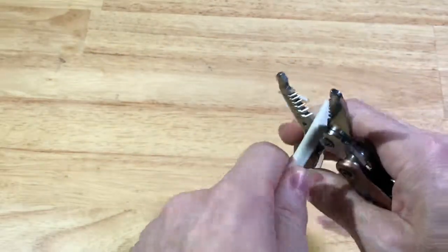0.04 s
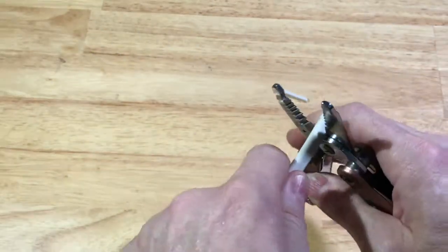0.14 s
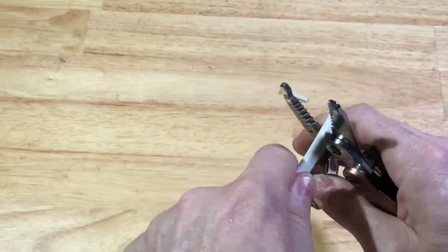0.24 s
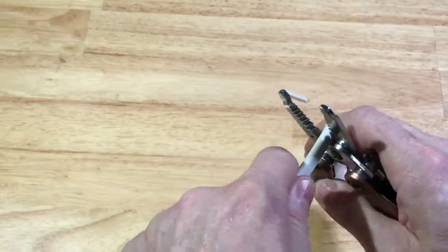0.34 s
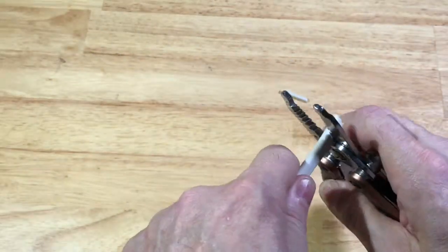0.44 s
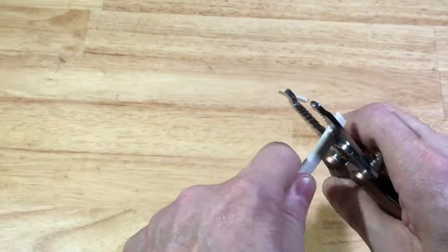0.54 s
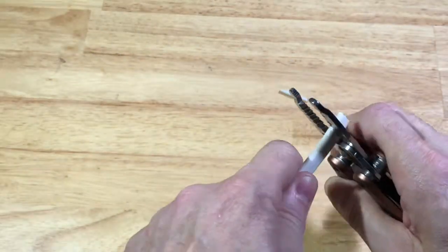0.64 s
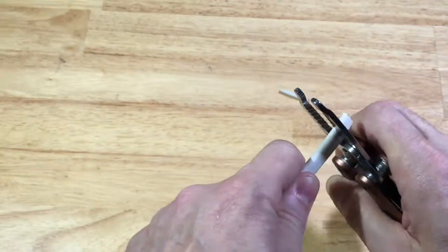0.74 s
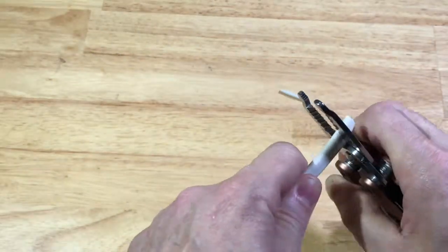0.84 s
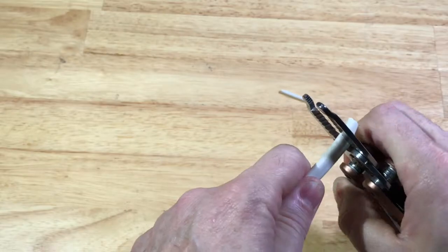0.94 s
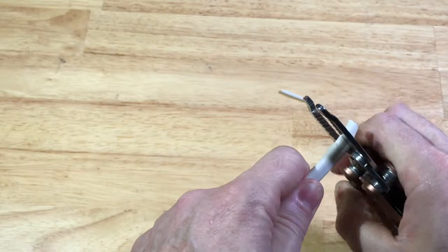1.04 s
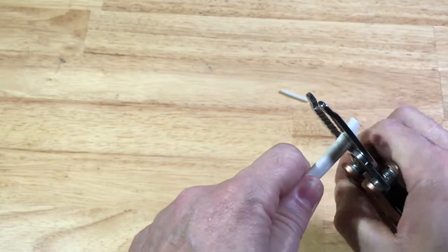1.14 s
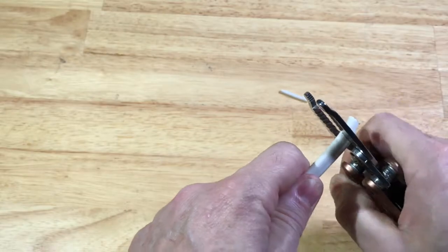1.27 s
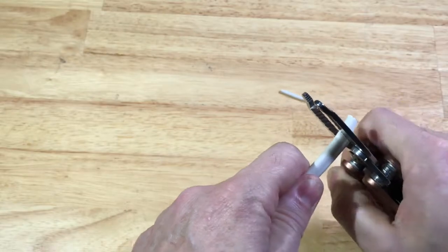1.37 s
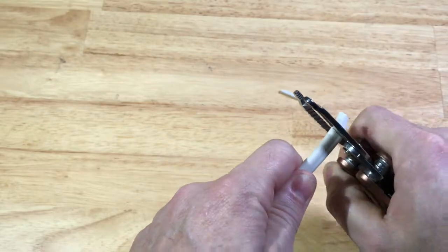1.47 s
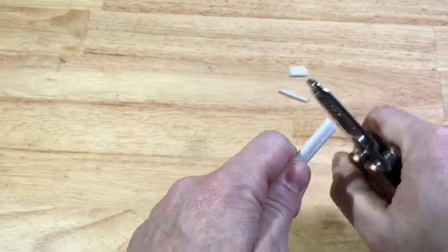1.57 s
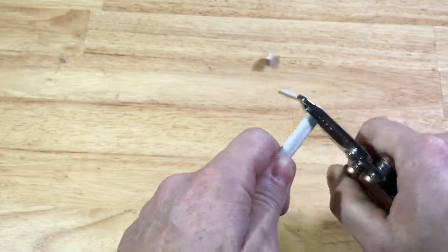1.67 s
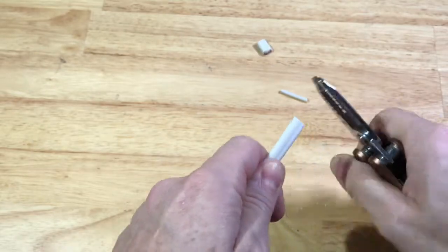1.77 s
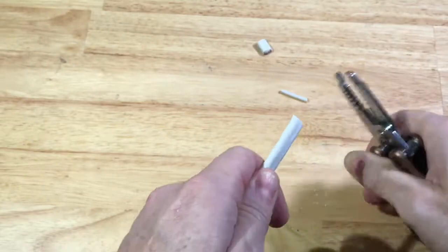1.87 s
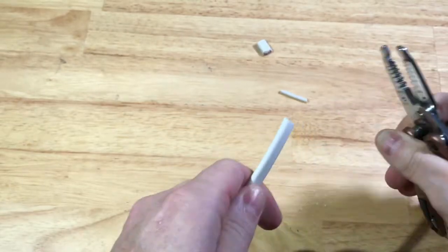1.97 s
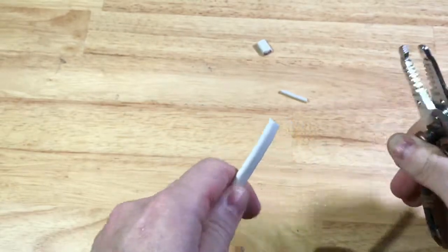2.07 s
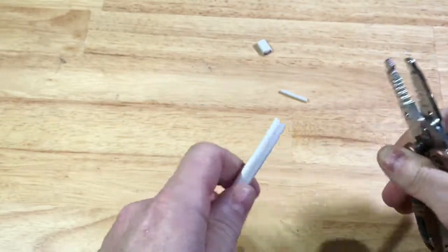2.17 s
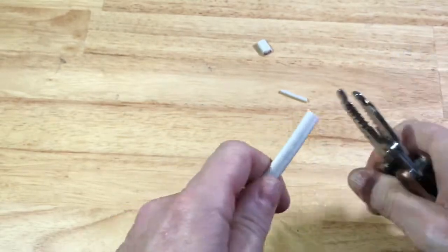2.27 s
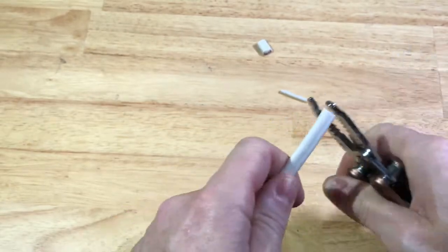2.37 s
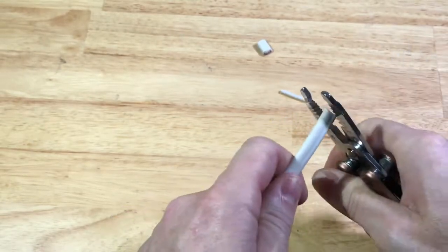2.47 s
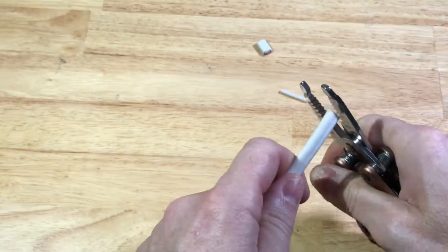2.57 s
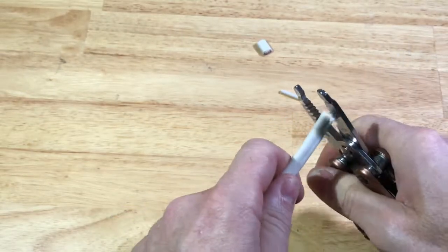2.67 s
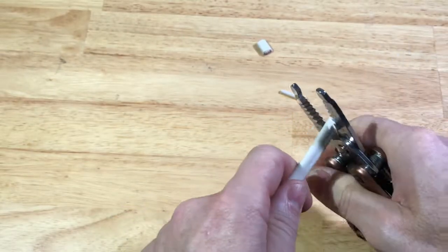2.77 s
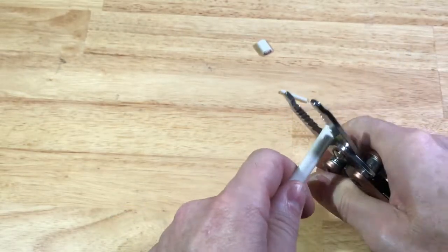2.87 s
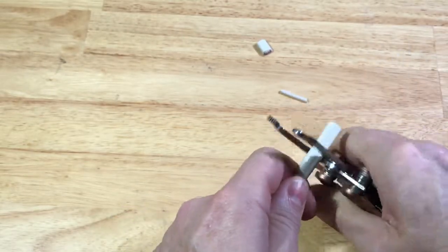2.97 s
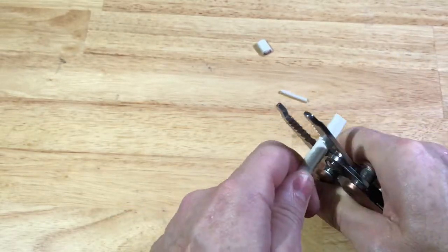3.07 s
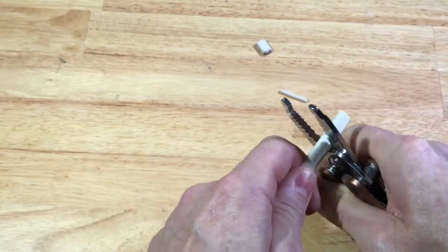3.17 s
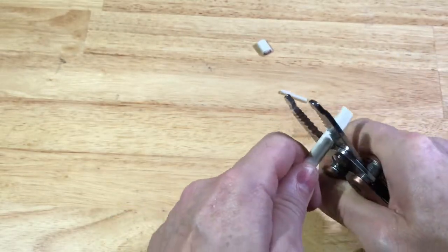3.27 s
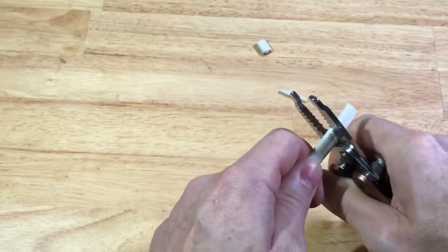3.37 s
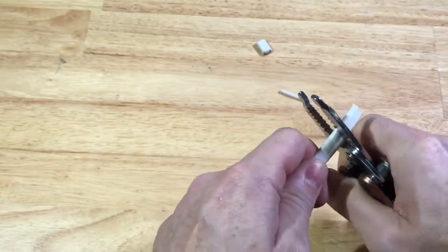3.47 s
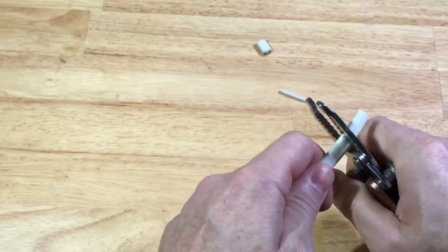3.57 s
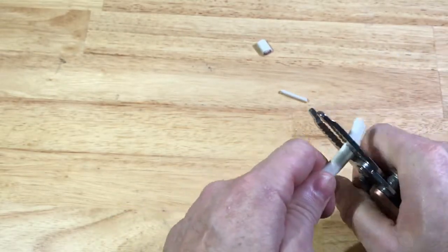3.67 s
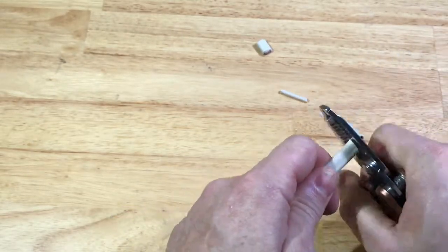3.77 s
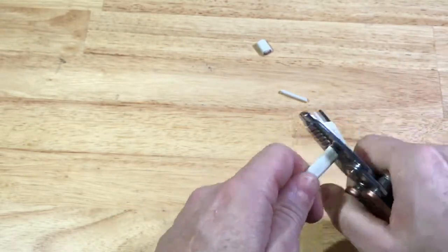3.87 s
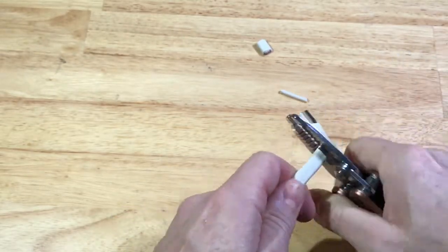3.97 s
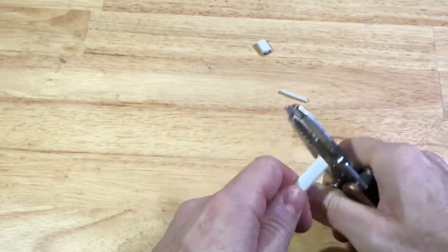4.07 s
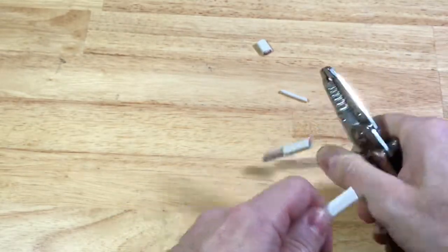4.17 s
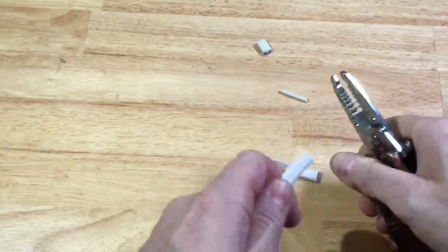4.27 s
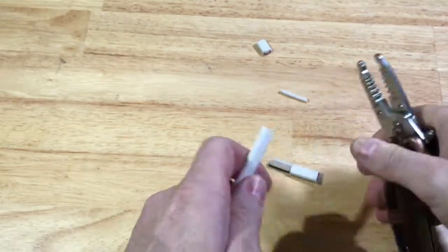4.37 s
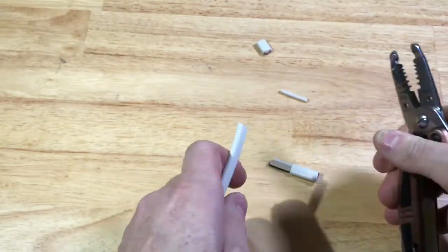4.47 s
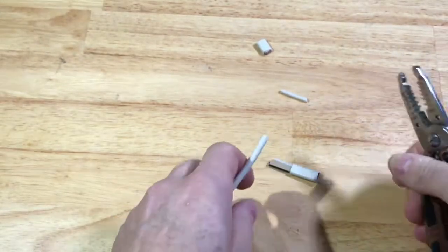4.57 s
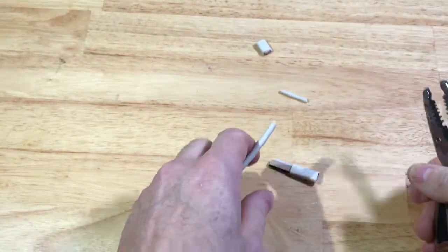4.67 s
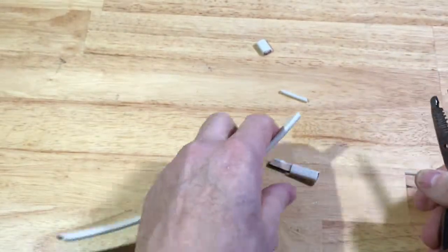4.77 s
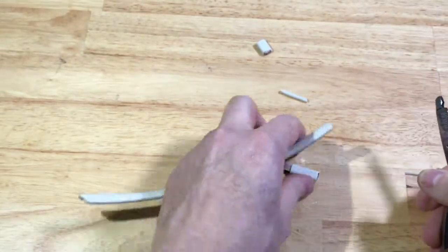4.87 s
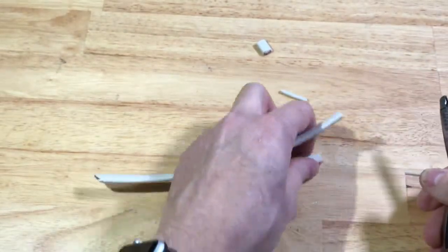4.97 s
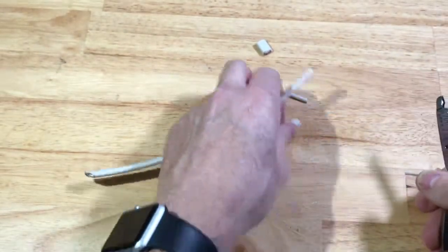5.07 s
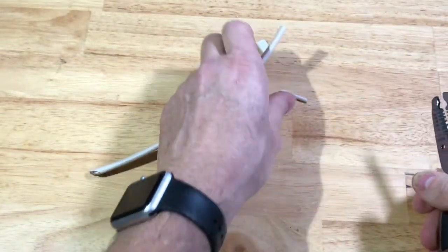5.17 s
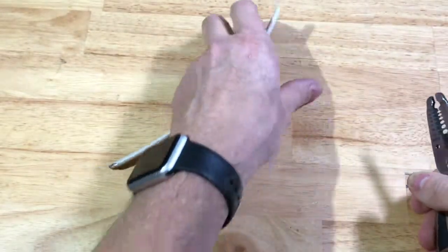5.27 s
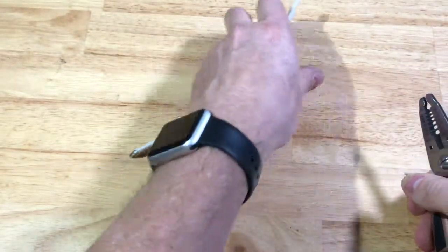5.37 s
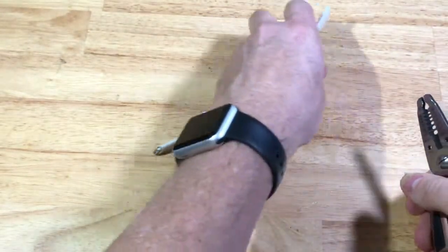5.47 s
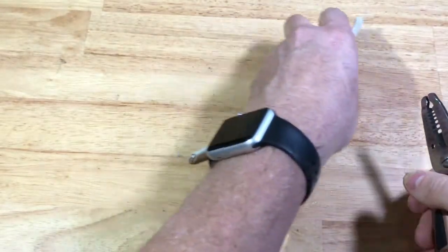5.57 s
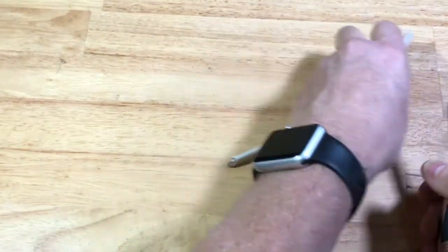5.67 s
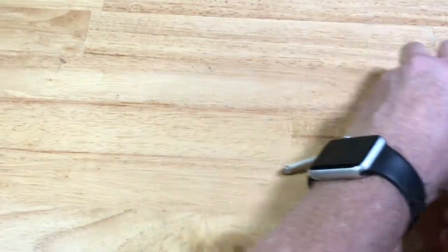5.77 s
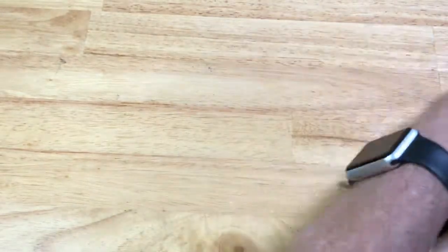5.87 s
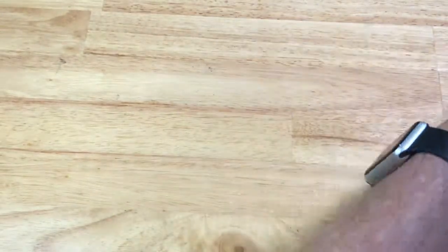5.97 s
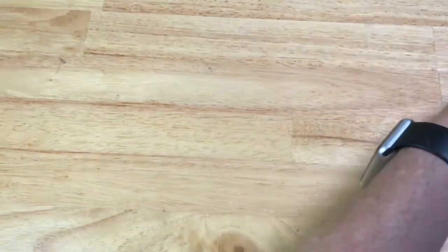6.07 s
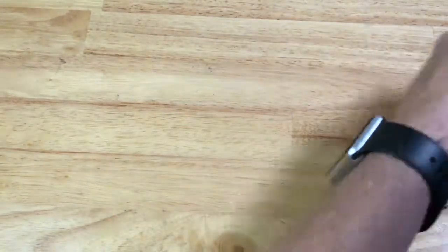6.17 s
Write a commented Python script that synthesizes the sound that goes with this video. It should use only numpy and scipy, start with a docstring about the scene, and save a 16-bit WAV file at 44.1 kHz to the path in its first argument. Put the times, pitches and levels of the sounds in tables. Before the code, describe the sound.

Steel wire strippers creak and tick on a plastic-sheathed cable, crunch and slam shut twice, offcuts knock on a wooden bench, then a hand sweeps.

```python
"""Over room air and a low hum, steel wire strippers creak and tick on a sheathed cable, crunch through it and slam shut.
Offcuts and the tool knock on the wooden bench, plastic scrapes, loose parts click, and a second cut follows.
Last, a hand sweeps the scraps away. Blows are short noise bursts plus decaying modes of steel or wood;
creaks, scrapes and the sweep are flickering friction noise. A small room answers all but the air and hum."""
import sys
import numpy as np
from scipy import signal
from scipy.fft import rfft, irfft
from scipy.io import wavfile
from scipy.ndimage import uniform_filter1d

SR = 44100
rng = np.random.default_rng(int(sys.argv[2]) if len(sys.argv) > 2 else 0)


def bounce(signal):
    """Save signal as a 16-bit WAV file at the path given by the first command-line argument."""
    frames = np.transpose(np.atleast_2d(signal))
    limited = np.clip(frames, -1, 1)
    pcm = np.round(limited * 32767).astype(np.int16)
    wavfile.write(sys.argv[1], SR, pcm)


N = 274743
T = np.arange(N) / SR
HIT = T[:2 ** 15]  # time since a blow [s]
TOP_HZ = 16100  # upper edge of the room's echoes and of the finished sound


def undb(db):
    """Turn decibels into gain."""
    return 10 ** (np.asarray(db) / 20)


def unit(x):
    """Scale to an energy of one."""
    return x / np.sqrt(np.sum(x ** 2))


def level(x, db):
    """Scale to an rms level."""
    return x * undb(db) / np.std(x)


def add(out, s, x):
    """Mix a sound in at a time in seconds."""
    i = int(s * SR)
    out[i:i + len(x)] += x[:N - i]


def colour(x, points, size=4096):
    """Filter with a spectrum of (frequency [Hz], level [dB]) points, at minimum phase so nothing sounds early."""
    hz, db = np.transpose(points)
    grid = np.maximum(np.fft.rfftfreq(size, 1 / SR), 1)
    curve_db = np.interp(np.log(grid), np.log(hz), db)
    # folding the cepstrum onto positive time makes the filter causal
    cepstrum = irfft(np.log(undb(curve_db)))
    cepstrum[1:size // 2] *= 2
    cepstrum[size // 2 + 1:] = 0
    response = irfft(np.exp(rfft(cepstrum)))
    return signal.fftconvolve(x, response)[:len(x)]


def band(x, low_hz, top_hz, order=2):
    """Keep what lies between two edges."""
    for hz, kind in ((low_hz, "high"), (top_hz, "low")):
        sos = signal.butter(order, min(hz, SR / 2 - 1000), kind, fs=SR, output="sos")
        x = signal.sosfilt(sos, x + 1e-18)
    return x


def resonate(x, hz, width_hz):
    """Pass one resonance with a gain of one at its centre."""
    return signal.lfilter(*signal.iirpeak(hz, hz / width_hz, fs=SR), x)


def fade(t, t60):
    """Amplitude that falls 60 dB in t60 seconds."""
    return np.exp(-np.log(1000) * t / t60)


def walk(rate):
    """Random drift with a spread of one, heading for a new value about rate times a second."""
    k = max(int(SR / rate), 2)
    steps = np.repeat(rng.standard_normal(N // k + 1), k)
    return level(uniform_filter1d(steps, k)[:N], 0)


def ring(modes, scatter_db):
    """Decaying modes of a struck body; each blow weights them anew."""
    hz, db, t60 = np.transpose(modes)[:, :, None]
    gain = undb(db + scatter_db * rng.standard_normal(hz.shape))
    sign = rng.choice([-1, 1], hz.shape)
    weight = gain * sign / np.sqrt(t60)  # long modes start lower
    return unit(np.sum(weight * fade(HIT, t60) * np.sin(2 * np.pi * hz * HIT), axis=0))


def burst(envelope, spectrum):
    """A crowd of tiny impacts under an envelope, evenly spread over all pitches, heard through a body."""
    x = rng.standard_normal(len(envelope)) * envelope
    for _ in range(3):  # flatten the spectrum, then restore the envelope
        x = irfft(np.exp(1j * np.angle(rfft(x))), len(x))
        loudness = np.sqrt(np.abs(uniform_filter1d(x ** 2, size=64)) + 1e-18)
        x = envelope * x / loudness
    return unit(colour(x, spectrum))


def blow(x, db, low_hz, top_hz):
    """The contact narrows the band; the level is that of the energy packed into 10 ms."""
    return unit(band(x, low_hz, top_hz)) * undb(db) * np.sqrt(SR / 100)


def friction(spectrum, grain_db, flicker_db, count=10):
    """Dense tiny slips of uneven size, whose pitch regions flicker independently so the colour shifts."""
    size_db = grain_db * np.minimum(rng.exponential(size=N), 6)
    slips = colour(rng.standard_normal(N) * undb(size_db), spectrum)
    pitch = np.log(np.fft.rfftfreq(N, 1 / SR) + 1)
    centres = np.log(np.geomspace(300, 14000, count))
    spread = rfft(slips)
    shifting = np.zeros(N)
    for own in np.eye(count):
        region = irfft(spread * np.interp(pitch, centres, own), N)
        shifting += region * undb(flicker_db * walk(22))
    return level(shifting, 0)


# tone of the still room air: (frequency [Hz], density [dB per Hz])
AIR_TONE = [(15, -39.5), (25, -6), (66, -2), (89, -7), (108, -21.5), (123, -5.5), (145, 0), (170, -18.5),
            (206, -14.5), (354, -18), (734, -25), (962, -28.5), (2610, -33), (16000, -40.5)]


def background(hum_hz=140, hum_db=-73, air_db=-63, rumble_hz=44):
    """Still room air as coloured noise, and a low hum that wavers in phase and level."""
    hum = np.sin(2 * np.pi * hum_hz * T + 0.52 * walk(2.6)) * undb(2.8 * walk(4.7))
    air = band(colour(rng.standard_normal(N), AIR_TONE), rumble_hz, SR / 2, order=4)
    return level(air, air_db) + level(hum, hum_db)


# how the room answers: (frequency [Hz], t60 [s], echo level [dB])
ROOM_BANDS = [(130, 0.35, -7), (400, 0.29, -9.5), (990, 0.61, -12), (2400, .56, -14), (5500, 0.58, -15),
              (8900, 0.25, -19), (15000, 0.3, -18)]


def room(x, build_s=0.0065, count=27):
    """Diffuse wall echoes: noise in each band swells with the sound's energy and drains at that band's rate."""
    hz, t60, db = np.transpose(ROOM_BANDS)
    edges = np.geomspace(70, TOP_HZ, count)
    out = 0
    for low, top in zip(edges, edges[1:]):
        sos = signal.butter(2, [low, top], "band", fs=SR, output="sos")
        centre = np.log(low * top) / 2
        decay = np.interp(centre, np.log(hz), t60)
        wet_db = np.interp(centre, np.log(hz), db)
        energy = signal.sosfilt(sos, x + 1e-18) ** 2
        for seconds in (build_s, decay / (2 * np.log(1000))):
            keep = np.exp(-1 / (seconds * SR))
            energy = signal.lfilter([1 - keep], [1, -keep], energy)
        echoes = level(signal.sosfilt(sos, rng.standard_normal(N)), wet_db)
        out = out + np.sqrt(energy) * echoes
    return out


# the sweeping hand, before trims and grit: (time [s], rub of the palm [dB], hiss of the skin [dB])
HAND_MOVES = [(4.9, -72, -95), (5.012, -68, -64.5), (5.08, -80, -69.5), (5.126, -63.5, -55),
              (5.264, -59.5, -69), (5.286, -64, -64.5), (5.376, -65.5, -70), (5.532, -66.5, -56),
              (5.564, -53, -52), (5.598, -55, -70), (5.766, -58, -59), (5.932, -57.5, -63),
              (6.024, -56, -57), (6.058, -46, -62), (6.186, -76.5, -83), (6.22, -84, -82)]
# tone of the palm's rub: (frequency [Hz], level [dB])
PALM_TONE = [(100, -3.5), (250, 5), (600, 3), (1500, 0.5), (3000, -3), (6000, -7), (14000, -26.5)]
# tone of the skin's hiss: (frequency [Hz], level [dB])
SKIN_TONE = [(1000, -22), (3000, -8), (5500, -0.5), (9000, 1), (13000, -0.5), (16000, -2)]


def hand(palm_db=0, skin_db=-1, grit_db=1.0, grit_per_s=350):
    """A hand slides over the wood, catching on its grain and pushing the scraps along."""
    s, *columns = np.transpose(HAND_MOVES)
    rub, hiss = (undb(np.interp(T, s, c, left=-120)) for c in columns)
    grit = undb(grit_db * walk(grit_per_s))
    palm = rub * undb(palm_db) * friction(PALM_TONE, grain_db=2.0, flicker_db=4.0)
    skin = hiss * undb(skin_db) * friction(SKIN_TONE, grain_db=1.5, flicker_db=4.5)
    return grit * (palm + skin)


# modes of the bench and what lies on it: (frequency [Hz], level [dB], t60 [s])
WOOD_MODES = [(134.2, 6.5, 0.47), (196, -4, 0.27), (267, -5, .22), (326.9, -14.5, 0.65), (383, 3.5, 0.17),
              (451, -2, 0.46), (521, -12.5, 0.21), (726, -8, 0.083), (860, -4, 0.14), (1016, -0.5, .09),
              (1183.4, -4.5, 0.1), (1507, -25, 2.2), (8005, -33.5, 0.22)]
# dense wood resonances between the modes: (frequency [Hz], density [dB per Hz])
WOOD_TONE = [(80, -5), (150, 0), (500, -5.5), (950, -2), (1400, -7), (2000, -16), (3000, -23), (5000, -30),
             (9000, -30.5), (16000, -23.5)]


def knock(db, top_hz, modes_db=-2.5, board_db=1, board_t60=0.12):
    """A blow spreads through the wooden top, whose modes ring on; a softer one lasts longer and reaches lower."""
    softness = 4000 / top_hz
    contact = 0.0054 * softness ** 0.49  # [s]
    low_hz = 118 / softness ** .18
    push = burst(np.exp(-(HIT / contact) ** 2 / 2), WOOD_TONE)
    board = undb(board_db) * burst(fade(HIT, board_t60), WOOD_TONE)
    modes = undb(modes_db) * ring(WOOD_MODES, scatter_db=.3)
    onset = 1 - np.exp(-10 * HIT / contact)  # a soft contact builds up slowly
    return blow(onset * (push + board + modes), db, low_hz, top_hz)


# knocks on the bench: (time [s], level [dB], top edge [Hz], high for a hard contact)
BENCH_KNOCKS = [(1.743, -35, 8780), (1.814, -52, 2994), (1.9382, -15.5, 4180), (4.085, -54, 5000),
                (4.2985, -34, 6950), (4.353, -44.5, 1500), (4.387, -38, 1300), (4.414, -44.5, 695),
                (4.6394, -22.5, 4850), (5.25, -48.5, 5000), (5.413, -43, 98)]


def bench(bounce_s=.012, bounce_db=-9.5, bounce_top_share=0.54):
    """Things land on the bench and bounce once, weaker and duller."""
    out = np.zeros(N)
    for s, db, top_hz in BENCH_KNOCKS:
        add(out, s, knock(db, top_hz))
        add(out, s + bounce_s, knock(db + bounce_db, bounce_top_share * top_hz))
    return out


# tone of the rubbed plastic sheath, for scrapes and creaks: (frequency [Hz], level [dB])
SHEATH_TONE = [(500, -10.5), (2200, 1.5), (4500, 0), (8000, -4), (11000, -8.5), (16000, -12.5)]
# plastic strokes on the blades or the bench: (middle [s], length [s], level [dB], squeak [Hz])
SCRAPE_STROKES = [(1.081, 0.013, -66, 6840), (1.137, 0.0065, -65.5, 2088), (1.314, 0.014, -68.5, 2060),
                  (1.359, 0.011, -67, 5713), (3.037, 0.042, -61, 4700), (4.056, 0.057, -61.5, 4810),
                  (5.825, .067, -54, 5570), (5.925, 0.065, -53.5, 2280), (5.999, 0.023, -50, 4960)]


def scrapes(squeak_db=-5, squeak_share=0.2):
    """The plastic sheath creeps over steel or wood in short strokes, each with a faint squeak."""
    slips = friction(SHEATH_TONE, grain_db=4, flicker_db=3.0)
    out = np.zeros(N)
    for s, length, db, hz in SCRAPE_STROKES:
        squeak = level(resonate(slips, hz, squeak_share * hz), squeak_db)
        stroke = np.exp(-2 * ((T - s) / length) ** 2)
        out += level(slips + squeak, db) * stroke
    return out


# modes of the tool: (frequency [Hz], level [dB], t60 [s])
STEEL_MODES = [(899.6, -4.5, 0.029), (1844, -2, .03), (2249, -1, 0.025), (2855, 0.5, 0.046),
               (2910, -6, 0.033), (4234, -4, 0.041), (4760, -2.5, .025), (5890, 0, .025),
               (6770, -3.5, .025), (7900, -4, .025), (9000, 1, 0.022), (10260, -7, 0.033)]
# dense steel resonances between the modes: (frequency [Hz], density [dB per Hz])
STEEL_TONE = [(120, -15), (300, -6.5), (600, -14.5), (1300, -8.5), (2000, 0.5), (2800, -2), (3500, -3),
              (5500, 0.5), (9000, 2), (12500, -4), (16000, -4.5)]


def clink(db, chatter, part_hz, low_hz, top_hz, modes_db=-5.5, rattle_db=-5, rattle_t60=0.048,
          part_db=-8, part_t60=0.013):
    """Steel meets steel: a short chatter, the struck part pings, the arms ring, the pivot and spring rattle."""
    crack = burst(np.exp(-(HIT / chatter) ** 2 / 2), STEEL_TONE)
    part = undb(part_db) * unit(fade(HIT, part_t60) * np.sin(2 * np.pi * part_hz * HIT))
    arms = undb(modes_db) * ring(STEEL_MODES, scatter_db=2.0)
    rattle = undb(rattle_db) * burst(fade(HIT, rattle_t60), STEEL_TONE)
    return blow(crack + part + arms + rattle, db, low_hz, top_hz)


def click(db, chatter, part_hz, top_hz, **ping):
    """A light contact moves only one part: the higher its pitch, the thinner the sound."""
    return clink(db, chatter, part_hz, 0.29 * part_hz, top_hz, **ping)


# the jaws bear down on the sheath: (start [s], end [s], level of the creaking [dB])
JAW_SQUEEZES = [(0.883, 1.39, -78.5), (3.62, 3.788, -70)]


def squeezes(ramp_s=.05, ticks_per_s=9.7, tick_db=9, tick_spread_db=8, tick_hz=4200, pitch_spread=0.46):
    """Under load the sheath creaks, and the blades slip through it in faint, pitched ticks."""
    creak = friction(SHEATH_TONE, grain_db=3.5, flicker_db=2)
    out = np.zeros(N)
    for start, end, db in JAW_SQUEEZES:
        load = np.clip(np.minimum(T - start, end - T) / ramp_s, 0, 1)
        out += undb(db) * creak * load
        count = int(ticks_per_s * (end - start))
        for when, strength, pitch in rng.random((count, 3)):
            hz = tick_hz * np.exp(pitch_spread * (2 * pitch - 1))
            loud_db = db + tick_db + tick_spread_db * strength
            tick = click(loud_db, .0015, hz, 11000, part_db=1)
            add(out, start + (end - start) * when, tick)
    return out


# the jaws slam shut after a cut: (time [s], level [dB], pitch of the struck part [Hz], its ping [dB])
JAW_SLAMS = [(1.5982, -12.5, 8400, -6), (3.7882, -12, 2050, -6.5)]
# before every slam the cable crunches, then parts:
# (lead [s], level re the slam [dB], chatter [s], pitch [Hz], top edge [Hz])
CABLE_STAGES = [(.021, -41.5, .004, 4100, 11000), (.0033, -10.5, 0.0008, 2500, 12000)]
# lighter clicks of the tool and the scraps:
# (time [s], level [dB], chatter [s], pitch of the struck part [Hz], top edge [Hz])
LIGHT_CLICKS = [(0.9908, -52.5, 0.00028, 2240, 11900), (1.269, -54, 0.0038, 1940, 8000),
                (1.717, -51, .0008, 5870, 8000), (1.7422, -37.5, 0.0054, 1290, 10700),
                (2.4876, -43, 0.00039, 5440, 5410), (3.6661, -42.5, 0.00019, 4630, 15000),
                (3.6876, -48, .0002, 5800, 16000), (3.736, -65, 0.0017, 4270, 8900),
                (4.156, -47, 0.00082, 2280, 15400), (4.22, -34, 0.0021, 2750, 15000),
                (4.2955, -27.5, 0.0019, 4700, 8100), (5.247, -53, 0.00155, 2920, 10220),
                (5.9371, -45.5, 0.0009, 4520, 14000)]


def jaws():
    """Each cut crunches, parts and slams the whole tool shut; loose parts click around the cuts."""
    out = np.zeros(N)
    for s, db, part_hz, ping_db in JAW_SLAMS:
        for lead, stage_db, chatter, hz, top_hz in CABLE_STAGES:
            add(out, s - lead, click(db + stage_db, chatter, hz, top_hz))
        slam = clink(db, 0.004, part_hz, low_hz=150, top_hz=16000, part_db=ping_db, part_t60=0.0052)
        add(out, s, slam)
    for s, db, chatter, part_hz, top_hz in LIGHT_CLICKS:
        add(out, s, click(db, chatter, part_hz, top_hz))
    return out


def scene():
    """Hand, bench, plastic and tool, close by in the room."""
    near = hand() + bench() + scrapes() + squeezes() + jaws()
    return (background() + room(near) + near)[None]


def record(dry, ceiling=1.0):
    """The microphone softly rounds high peaks, and the extreme treble is cut."""
    rounded = ceiling * np.tanh(dry / ceiling)
    return signal.sosfilt(signal.ellip(10, .2, 80, TOP_HZ, fs=SR, output="sos"), rounded)


dry = scene()
out = record(dry)
bounce(out)
```